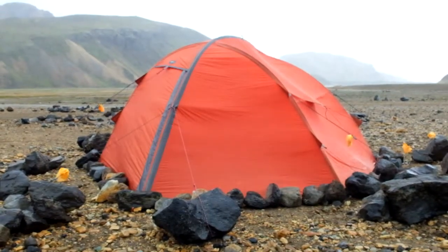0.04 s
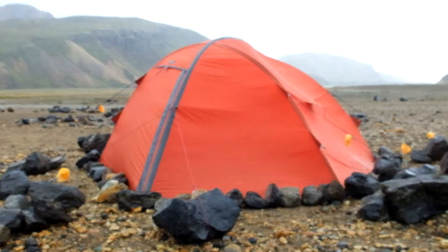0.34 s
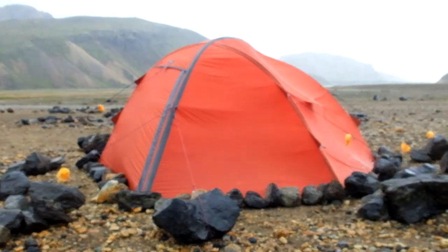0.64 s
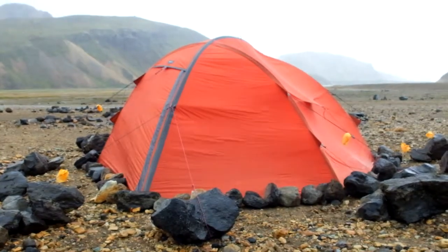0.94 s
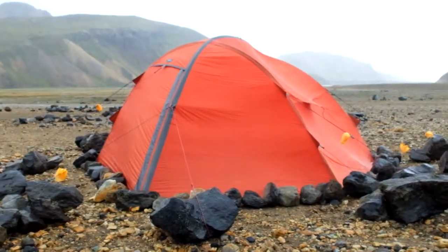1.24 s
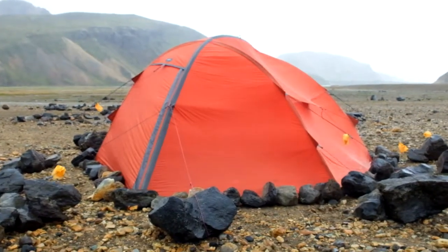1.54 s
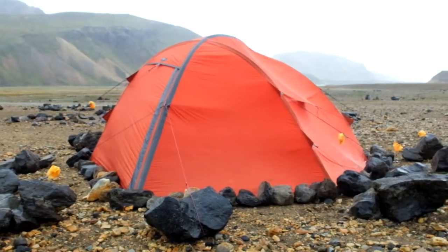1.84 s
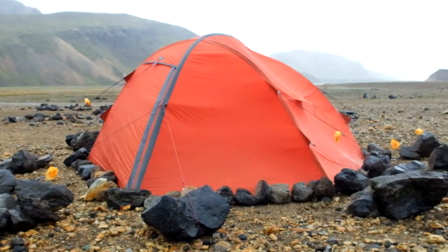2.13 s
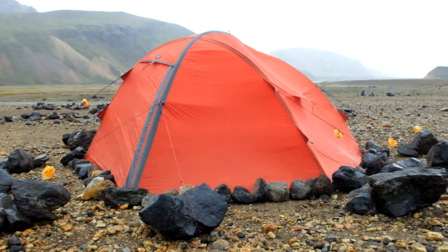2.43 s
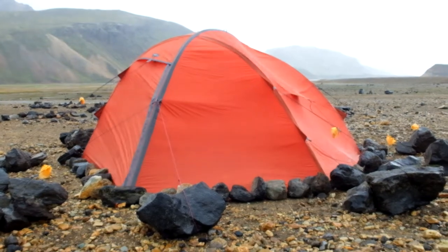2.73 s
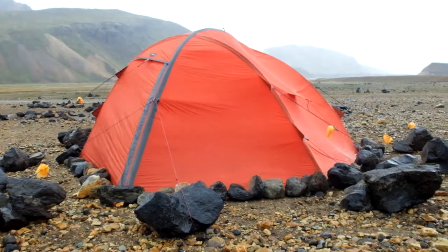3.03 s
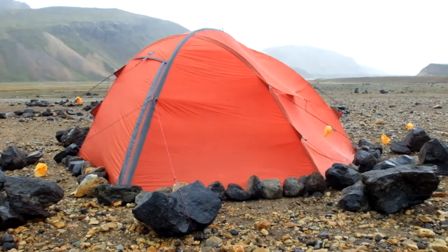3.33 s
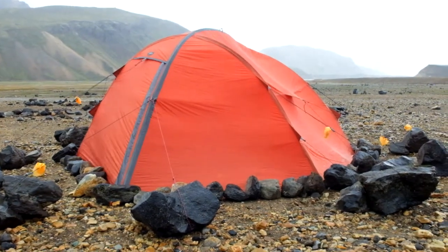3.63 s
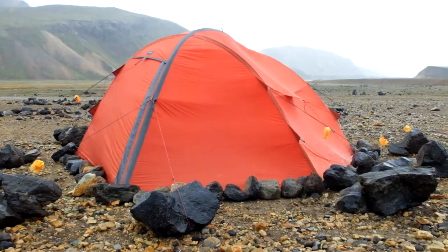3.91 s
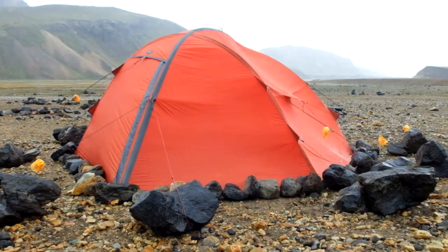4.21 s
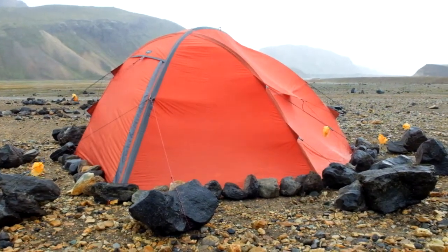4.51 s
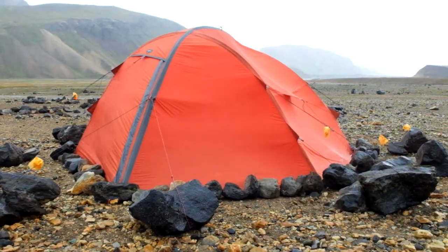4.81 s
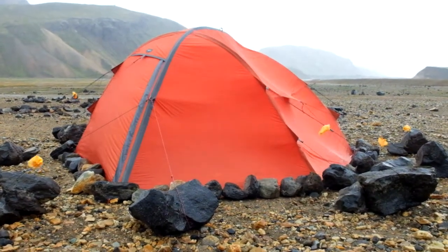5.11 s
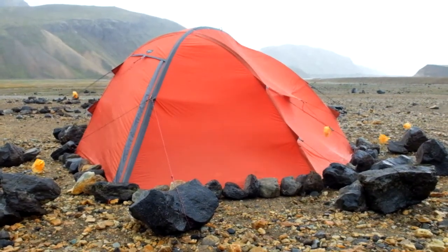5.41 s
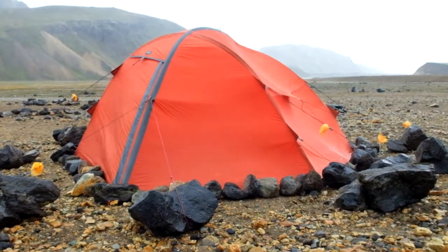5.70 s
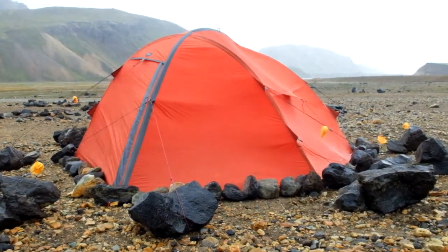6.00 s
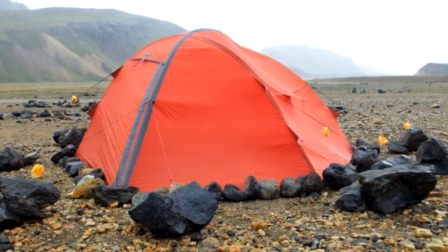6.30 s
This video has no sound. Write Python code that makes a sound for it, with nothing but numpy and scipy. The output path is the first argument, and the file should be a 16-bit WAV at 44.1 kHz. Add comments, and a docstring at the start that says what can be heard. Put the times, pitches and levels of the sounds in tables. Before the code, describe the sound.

Gusting wind rumbles and buffets the microphone outdoors, uneven at first, then building to a rough, tearing roar with brief lulls. The left side roars more steadily while the right takes quick thumps and pops. Much quieter, a nearby tent's fabric hisses in swells over a wide rush of air, and a little blown grit ticks.

```python
"""Gusts on a microphone

Strong gusts cross a gravel plain and blow into the two microphone ports of a camera beside a tent.
Turbulent pressure makes the left port roar steadily, while separate eddies buffet the right one.
The hardest gusts pin the diaphragms against their stops for milliseconds, so the roar tears.
Behind it the open air rushes, the tent fabric hisses in swells, and a little grit ticks."""
import sys
import numpy as np
from scipy import signal
from scipy.fft import rfft, irfft, next_fast_len
from scipy.io import wavfile

SR = 44100
rng = np.random.default_rng(int(sys.argv[2]) if len(sys.argv) > 2 else 0)


def pcm_store(signal):
    """Save signal as 16-bit PCM."""
    levels = np.round(np.clip(np.atleast_2d(signal), -1, 1) * 32767)
    wavfile.write(sys.argv[1], SR, levels.astype(np.int16).T)


N = 280035
T = np.arange(N) / SR

# Spectra of the open air and of the fabric hiss: (frequency [Hz], relative density [dB])
PLAIN_SPECTRUM = [(20, -14), (90, -5.5), (300, -10), (600, -10), (1000, -11), (1700, -20), (2500, -21),
                  (3500, -39), (8000, -49)]
HISS_SPECTRUM = [(800, -41), (2000, -18), (3200, 10.5), (4500, 9.5), (6500, 5), (8000, 1.5), (10000, -1.5),
                 (14000, -6.5), (16000, -22)]
# The hiss lies mostly to the right: (frequency [Hz], left minus right [dB])
HISS_BALANCE = [(2000, -12.5), (4400, -6), (8000, -7.5), (13000, 1.5)]
# Swells of air and fine grit over the tent: (time [s], level [dB], half width [s])
HISS_SWELLS = [(0.5, -53.5, 0.13), (1.14, -58, 0.11), (1.4, -51, 0.05), (1.67, -56.5, 0.32),
               (2.45, -53, 0.065), (3.2, -56, 0.29), (4.08, -50.5, 0.2), (4.95, -49.5, 0.42),
               (5.62, -50.5, 0.08), (5.9, -57, 0.19), (6.251, -63, 0.1)]
# Strength of the airflow over each port: (time [s], level [dB])
LEFT_FLOW = [(0.0, -27.5), (0.15, -23), (0.34, -38.5), (0.53, -22.5), (0.66, -32.5), (0.86, -24),
             (1.15, -24), (1.37, -32.5), (1.43, -26), (1.52, -29.5), (1.68, -18.5), (1.85, -19.5),
             (2.56, -20.5), (2.72, -29.5), (2.8, -24.5), (2.94, -44.5), (3.16, -27.5), (3.26, -34.5),
             (3.67, -35), (3.688, -19), (4.97, -16.5), (5.55, -21), (5.59, -30.5), (5.87, -29), (5.92, -18),
             (5.99, -40), (6.25, -17.5), (6.34, -22.5)]
RIGHT_FLOW = [(0.0, -26.5), (0.17, -28.5), (0.25, -32.5), (0.48, -20.5), (0.65, -34), (0.68, -27.5),
              (1.25, -21), (1.31, -31), (1.35, -19), (2.53, -16.5), (2.97, -23.5), (3.17, -16), (3.32, -33),
              (3.38, -22), (3.58, -38.5), (3.62, -17), (4.2, -19.5), (4.23, -13.5), (5.28, -14),
              (5.71, -19), (5.8, -16), (6.1, -20.5), (6.22, -12), (6.34, -16)]
# The flow lifts off a port: (time [s], depth [dB], half width [s], port [0 left, 1 right])
LULLS = [(0.256, 11, 0.018, 0), (0.373, 9, 0.017, 1), (0.462, 13, 0.016, 0), (1.852, 4.5, 0.081, 0),
         (2.08, 7.5, 0.026, 0), (2.29, 3.5, 0.025, 0), (2.325, 5, 0.008, 1), (2.435, 4, 0.016, 0),
         (2.673, 11, 0.012, 1), (2.84, 8, 0.023, 1), (2.925, 5, 0.012, 1), (3.055, 15, 0.018, 1),
         (3.294, 4, 0.038, 1), (3.3, 9, 0.041, 0), (3.67, 33, 0.013, 1), (3.75, 2.5, 0.016, 0),
         (4.47, 1.5, 0.011, 0), (5.46, 6, 0.027, 1), (5.623, 5.5, 0.019, 1), (5.872, 34, 0.013, 1),
         (5.865, 7, 0.015, 0), (6.04, 0, 0.01, 1), (6.094, 0.5, 0.009, 1)]
# Spectrum of the turbulence at each port: (frequency [Hz], relative density [dB])
LEFT_SPECTRUM = [(20, -10.5), (45, 7.5), (85, 4), (170, 4), (300, -1), (550, -8.5), (1000, -14),
                 (1800, -24.5), (2500, -27), (3500, -43), (5500, -53.5), (9000, -63), (15000, -88)]
RIGHT_SPECTRUM = [(20, -5), (45, -6), (90, 6), (200, 2), (400, -5.5), (650, -13), (1000, -18),
                  (1800, -29.5), (2600, -35.5), (4000, -45), (8000, -55), (15000, -88)]
# Fine turbulence at the left port: (time [s], level [dB], half length [s])
SPITS = [(0.008, -27, 0.008), (0.124, -32, 0.02), (0.165, -28.5, 0.006), (0.848, -25, 0.0052),
         (1.112, -27, 0.0062), (1.553, -25, 0.021), (1.637, -21, 0.006), (1.676, -18, 0.0093),
         (1.871, -29, 0.0071), (1.967, -18, 0.01), (1.996, -20, 0.004), (2.023, -17, 0.004),
         (2.05, -25, 0.005), (2.151, -20, 0.0056), (2.184, -22, 0.006), (2.214, -18.5, 0.0081),
         (2.346, -19, 0.008), (2.404, -15, 0.007), (2.476, -19, 0.0073), (2.758, -29, 0.0033),
         (3.693, -23, 0.012), (3.78, -19, 0.008), (3.925, -20, 0.006), (4.058, -14, 0.01),
         (4.261, -15, 0.0081), (4.292, -20, 0.0053), (4.517, -14, 0.006), (4.585, -15, 0.0042),
         (4.743, -9.5, 0.014), (4.827, -22, 0.0042), (4.929, -18, 0.0095), (5.204, -13, 0.0083),
         (5.255, -8.5, 0.0076), (5.484, -21, 0.0055), (5.544, -23, 0.0067), (5.919, -25, 0.011),
         (6.226, -13, 0.0041)]
# Strong eddies at the right port: (time [s], relative level [dB], half length [s], nominal corner [Hz])
BUFFETS = [(0.165, -21, 0.01, 370), (0.296, -20, 0.0081, 390), (0.339, -23, 0.02, 344),
           (0.424, -16.5, 0.021, 384), (0.472, -17, 0.026, 314), (0.496, -10, 0.0061, 615),
           (0.71, -18.5, 0.031, 400), (0.822, -18, 0.015, 430), (0.85, -15.5, 0.014, 573),
           (0.955, -15, 0.0087, 353), (1.028, -21.5, 0.01, 480), (1.175, -23, 0.016, 360),
           (1.226, -6.5, 0.0074, 463), (1.353, -15.5, 0.0078, 497), (1.469, -11.5, 0.0097, 685),
           (1.517, -19, 0.014, 1030), (1.556, -23, 0.0099, 646), (1.68, -36, 0.025, 634),
           (1.8, -16, 0.01, 545), (1.866, -11.5, 0.0056, 646), (1.942, -33, 0.0044, 860),
           (2.058, -16.5, 0.011, 765), (2.078, -8, 0.011, 1200), (2.108, -12.5, 0.014, 560),
           (2.267, -13.5, 0.027, 465), (2.346, -3.5, 0.0099, 680), (2.362, -18, 0.0046, 860),
           (2.393, -14, 0.0021, 816), (2.412, -9, 0.0045, 730), (2.448, -4.5, 0.011, 560),
           (2.53, -7, 0.0046, 590), (2.598, -13, 0.0039, 432), (2.631, -11.5, 0.0068, 510),
           (2.711, -13, 0.016, 550), (2.778, -15, 0.0071, 700), (2.878, -13.5, 0.017, 496),
           (2.9, -12, 0.0068, 420), (2.963, -19.5, 0.012, 290), (3.015, -16, 0.016, 366),
           (3.083, -9.5, 0.019, 486), (3.14, -16, 0.018, 507), (3.164, -10, 0.018, 820),
           (3.216, -15, 0.0031, 597), (3.24, -19, 0.0048, 447), (3.382, -11.5, 0.0086, 393),
           (3.445, -18.5, 0.022, 305), (3.615, -13.5, 0.0073, 352), (3.632, -10, 0.007, 520),
           (3.698, -13.5, 0.0077, 570), (3.722, -7.5, 0.0015, 760), (3.825, -12, 0.0095, 800),
           (3.848, -17, 0.031, 930), (3.897, -14.5, 0.0084, 676), (3.955, -12.5, 0.018, 620),
           (4.018, -10, 0.012, 776), (4.068, -14.5, 0.014, 740), (4.24, -23, 0.0069, 814),
           (4.297, -11.5, 0.013, 870), (4.42, -1.5, 0.014, 740), (4.449, -10.5, 0.013, 1010),
           (4.487, -13, 0.022, 900), (4.526, -10, 0.011, 740), (4.6, -11, 0.0134, 850),
           (4.655, -12.5, 0.029, 1100), (4.718, -11, 0.037, 680), (4.768, -10, 0.013, 1070),
           (4.808, -8.5, 0.0053, 1280), (4.838, -8, 0.021, 560), (4.905, -8.5, 0.019, 780),
           (4.952, -13, 0.025, 844), (5.12, -7, 0.008, 680), (5.143, -5, 0.0031, 1000),
           (5.175, -7, 0.0116, 1020), (5.245, -11.5, 0.013, 1110), (5.27, -11, 0.0092, 1360),
           (5.335, -9.5, 0.0091, 940), (5.387, -10, 0.0065, 1230), (5.503, -11.5, 0.027, 800),
           (5.552, -8.5, 0.023, 724), (5.585, -10, 0.0032, 536), (5.667, -13.5, 0.0059, 653),
           (5.762, -8.5, 0.023, 895), (5.79, -13, 0.017, 780), (5.819, -9.5, 0.012, 810),
           (5.839, -10, 0.0061, 700), (5.907, -23, 0.0086, 560), (5.946, -16, 0.0029, 557),
           (5.985, -11.5, 0.03, 430), (6.071, -10, 0.0077, 644), (6.117, -9.5, 0.013, 510),
           (6.134, -5.5, 0.0042, 600), (6.16, -10.5, 0.0075, 623), (6.203, -7, 0.0063, 760),
           (6.262, -12, 0.013, 670)]
# Vortex cores at the lip of a port: (time [s], peak level [dB], corner [Hz], port [0 left, 1 right])
CRACKS = [(0.296, -21, 596, 1), (0.431, -17, 480, 1), (0.476, -13, 520, 1), (0.494, -1.5, 676, 1),
          (0.850, -8.5, 750, 1), (1.221, -6, 624, 1), (1.227, -15, 520, 1), (1.353, -10, 480, 1),
          (1.511, -7.5, 1700, 1), (1.519, -9, 1400, 1), (1.683, -5.5, 2400, 0), (1.720, -9, 2000, 0),
          (1.793, -8, 800, 1), (1.864, -15, 1000, 1), (1.941, -14, 1600, 1), (1.984, -8, 2400, 0),
          (2.048, -6, 1000, 1), (2.063, -11, 1400, 1), (2.077, -16, 1900, 1), (2.081, -0.5, 2440, 1),
          (2.341, -5, 1100, 1), (2.348, -14, 1800, 1), (2.361, -4, 1100, 1), (2.394, -13, 1300, 1),
          (2.449, -9, 1400, 1), (2.528, -12, 1200, 1), (2.584, -26, 2400, 0), (2.624, -12, 700, 1),
          (2.714, -12, 1900, 1), (2.899, -5, 900, 1), (3.164, -13, 1100, 1), (3.174, -9, 2000, 1),
          (3.214, -10, 736, 1), (3.238, -4, 550, 1), (3.385, -16, 520, 1), (3.634, -9, 2200, 1),
          (3.823, -0.5, 1000, 1), (3.845, -12, 1500, 1), (3.859, -12, 1400, 1), (3.896, -3, 750, 1),
          (3.951, -4, 800, 1), (4.242, -6, 1700, 1), (4.447, -5, 2100, 1), (4.590, -4, 2400, 0),
          (4.660, 0.5, 2980, 0), (4.696, -4, 2200, 0), (4.719, -7, 1400, 1), (4.760, -4, 2600, 0),
          (4.764, -1, 1700, 1), (4.772, -3, 2200, 1), (4.785, 1, 2120, 1), (4.805, -10, 1700, 1),
          (5.142, 3, 1900, 1), (5.176, -3, 1900, 1), (5.201, -4, 2000, 1), (5.228, 0, 1400, 1),
          (5.236, -4, 1400, 1), (5.266, 2.5, 2200, 1), (5.270, -2.5, 2800, 1), (5.330, -2, 1600, 1),
          (5.387, -9, 2400, 1), (5.387, -5.5, 2400, 0), (5.750, 0, 2100, 1), (5.762, -4, 2600, 1),
          (5.812, -2, 1200, 1), (5.818, -11, 1500, 1), (5.841, -7.5, 1700, 1), (5.945, -2.5, 570, 1),
          (6.067, -9.5, 2100, 1), (6.076, -18, 1900, 1), (6.109, -7, 800, 1), (6.136, -5, 1900, 1),
          (6.159, -9, 1800, 1), (6.199, 3, 1100, 1), (6.207, -5, 1800, 1), (6.211, -9, 2400, 1)]
# Thin ticks, as of grit blown against the camera: (time [s], level [dB])
GRIT_TICKS = [(1.646, -48), (4.638, -44), (4.66, -45), (4.76, -42), (4.944, -42), (5.011, -51)]
# Hard shoves of air: (time [s], extra swing [dB], half width [s], port [0 left, 1 right])
SHOVES = [(2.16, 7.5, 0.19, 1), (3.775, 1, 0.043, 1), (5.42, 10.5, 0.064, 1), (6.26, 8, 0.093, 1)]
# Slams of air that pin both diaphragms and tear a tiny gap in the roar: (time [s], half width [s])
SLAMS = [(2.402, 0.0026), (4.790, 0.002), (4.979, 0.0022), (4.995, 0.0024), (5.044, 0.0017),
         (5.057, 0.0031), (5.125, 0.0019), (5.223, 0.0021), (5.261, 0.0011), (6.230, 0.002),
         (6.254, 0.0022)]

FULL_GUST_DB = -16.5  # flow level of a full gust
# Each law gives a level from the flow: (relative level in a full gust [dB], slope [dB per dB of flow])
LEFT_RUMBLE, LEFT_RASP = (-15.27, 1.074), (-8.27, 1.87)
RIGHT_RUMBLE, RIGHT_RASP = (-16.5, 1.16), (-16.5, 1.66)
SMALL_EDDIES, CRACKLE, SURGE = (-16, 0.91), (-25, 2.8), (-4.5, 1)


def undb(db):
    """Amplitude grows tenfold for every 20 dB."""
    return 10 ** (np.asarray(db) / 20)


def colour_db(points, hz):
    """A spectrum is interpolated in decibels over log frequency."""
    f, db = np.transpose(points)
    return np.interp(np.log(np.maximum(hz, 1)), np.log(f), db)


def unit(x):
    """Normalisation scales a signal to rms 1."""
    return x / np.sqrt(np.mean(x ** 2))


def noise(gain_at, size=N):
    """Filtering white noise gives it the spectrum gain_at(Hz); the rms is 1."""
    n = next_fast_len(size, True)
    hz = np.maximum(np.arange(n // 2 + 1) * SR / n, 1)
    return unit(irfft(rfft(rng.standard_normal(n)) * gain_at(hz), n)[:size])


def walk(rate_hz):
    """Low-passed noise wanders smoothly, with spread 1."""
    return noise(lambda hz: 1 / (1 + (hz / rate_hz) ** 4))


def bell(s, width):
    """A Gaussian rises and falls around time s."""
    return np.exp(-((T - s) / width) ** 2)


def at_ports(table):
    """Gaussian bumps add in decibels, on one track for each port."""
    out = np.zeros((2, N))
    for s, db, width, port in table:
        out[int(port)] += db * bell(s, width)
    return out


def add(out, s, burst):
    """By superposition a burst, centred on time s, adds to out."""
    at = int(s * SR) - len(burst) // 2 + np.arange(len(burst))
    inside = (at >= 0) & (at < N)
    out[at[inside]] += burst[inside]


def puff(spectrum, half_s, edge, size):
    """An envelope shapes noise into a burst of rms 1 at its crest; a higher edge is more abrupt."""
    t = (np.arange(size) - size // 2) / SR
    swell = np.exp(-2 * np.abs(t / half_s) ** edge)
    burst = noise(spectrum, size) * swell
    return burst * np.sqrt(np.sum(swell ** 2) / np.sum(burst ** 2))


def limited(x, stop, order):
    """Saturation is linear near rest and ends at a rounded stop; a higher order is harder."""
    return x / (1 + np.abs(x / stop) ** order) ** (1 / order)


def level_db(law, flow_db):
    """A power law of the flow is a straight line in decibels."""
    gust_db, slope = law
    return gust_db + slope * flow_db


def scattered(flow_db, law, spread_db, count):
    """Chance events fall one to a time slot, their levels scattered about a power law of the flow."""
    times = (np.arange(count) + rng.random(count)) / count * T[-1]
    levels = level_db(law, np.interp(times, T, flow_db)) + spread_db * rng.standard_normal(count)
    return zip(times, levels)


def air_rush(spectrum, flicker_db, coherence, balance=((20, 0), (20000, 0))):
    """A wide, flickering rush of air is only partly coherent between the two ports."""
    shared, left, right = (noise(lambda hz: undb(colour_db(spectrum, hz))) for _ in range(3))
    pair = np.sqrt(coherence) * shared + np.sqrt(1 - coherence) * np.array([left, right])
    n = next_fast_len(N, True)
    lean_db = colour_db(balance, np.arange(n // 2 + 1) * SR / n) / 2
    panned = irfft(rfft(pair, n) * undb([lean_db, -lean_db]), n)[:, :N]
    return panned * undb(flicker_db * walk(22))


def fabric_hiss(rest_db):
    """Air and grit sweep the tent; being incoherent, the swells and a steady hiss add in power."""
    power = undb(rest_db) ** 2 + sum(undb(db) ** 2 * bell(s, width) for s, db, width in HISS_SWELLS)
    hiss = air_rush(HISS_SPECTRUM, flicker_db=1.9, coherence=0.23, balance=HISS_BALANCE)
    grain = undb(2 * walk(900))
    return hiss * np.sqrt(power) * grain


def airflow():
    """The flow at each port, in dB above a full gust, drops wherever it separates in a lull."""
    flows = np.array([np.interp(T, *np.transpose(table)) for table in (LEFT_FLOW, RIGHT_FLOW)])
    return flows - FULL_GUST_DB - at_ports(LULLS)


def turbulence(rumble_db, rasp_db, spectrum, flutter_db, grain_db, own_db, rasp_grain_db):
    """Turbulence is intermittent: small, rasping eddies ride in packets on large, rumbling ones."""
    flutter, grain, rasp_grain = walk(24), walk(147), walk(340)
    out = np.zeros(N)
    for centre_hz in 20 * 2 ** np.arange(10):
        def band(hz):
            """Octave bands with cosine slopes overlap to constant power."""
            octaves = np.clip(np.log2(hz / centre_hz), -1, 1)
            return np.cos(np.pi / 2 * octaves) * undb(colour_db(spectrum, hz))

        band_gain = np.sqrt(np.sum(band(np.arange(1, SR // 2)) ** 2) / 270)
        smallness = np.clip(np.log(centre_hz / 200) / np.log(1300 / 200), 0, 1.15)  # 0 rumble, 1 rasp
        depth = np.clip(centre_hz / 450, 0, 1)  # low bands fluctuate less
        flicker_db = flutter_db * flutter + grain_db * grain + own_db * walk(50)
        packets = unit(undb(depth * flicker_db + smallness ** 2 * rasp_grain_db * rasp_grain))
        envelope = undb((1 - smallness) * rumble_db + smallness * rasp_db)
        out += band_gain * noise(band) * packets * envelope
    return out


def spits(low_hz, high_hz):
    """Fine turbulence fluctuates quickly, so its brief bursts sound bright."""
    spectrum = lambda hz: hz / np.hypot(hz, low_hz) ** 2 / np.hypot(1, (hz / high_hz) ** 4)
    out = np.zeros(N)
    for s, db, half_s in SPITS:
        add(out, s, undb(db) * puff(spectrum, half_s, edge=1.66, size=2048))
    return out


def hump(corner_hz, damping=1.0, low_share=0.28, knee=0.65, dull_above=3.6):
    """A damped resonance, cut in bass and treble, gives an eddy its hollow spectrum."""
    def spectrum(hz):
        r = hz / corner_hz
        bass_cut = r ** 2 / np.hypot(r ** 2, low_share ** 2)
        resonance = 1 / np.hypot(1 - r ** 2, damping * r)
        treble_cut = 1 / np.hypot(1, r / knee) / np.hypot(1, (r / dull_above) ** 2)
        return bass_cut * resonance * treble_cut
    return spectrum


def buffets(flow_db, small_hz, small_half_s, doubling_db):
    """A passing eddy is a grainy thump of pressure noise whose corner rises with its speed."""
    small = [(s, db, small_half_s, small_hz * 2 ** ((db - SMALL_EDDIES[0]) / doubling_db))
             for s, db in scattered(flow_db, SMALL_EDDIES, spread_db=2.5, count=60)]
    out = np.zeros(N)
    for s, db, half_s, corner_hz in list(BUFFETS) + small:
        body = puff(hump(0.9 * corner_hz), half_s, edge=8.2, size=8192)
        # the core passes fastest: brief, brighter and ahead of the middle
        core = puff(hump(1.49 * corner_hz), 0.45 * half_s, edge=0.76, size=8192)
        add(out, s, undb(db) * body)
        add(out, s - 0.1208 * half_s, undb(db - 5) * core)
    grain = unit(undb(3 * walk(262)))
    return out * grain


def pop(corner_hz, low_share=0.28, fall=3.6, size=1024):
    """Frequencies that share one random phase add up to a compact pressure pulse, here of peak 1."""
    r = np.arange(size // 2 + 1) * SR / size / corner_hz
    magnitude = r / np.hypot(r, low_share) / (1 + r ** fall)
    phase = np.exp(2j * np.pi * rng.random())
    pulse = np.roll(irfft(magnitude * phase, size), size // 2)
    return pulse / np.abs(pulse).max()


def cracks(flow_db, crackle_hz):
    """A tight vortex core makes a single pressure pulse; lesser ones crackle at the left port."""
    crackle = [(s, db, crackle_hz, 0) for s, db in scattered(flow_db, CRACKLE, spread_db=5, count=450)]
    out = np.zeros((2, N))
    for s, db, corner_hz, port in list(CRACKS) + crackle:
        add(out[int(port)], s, undb(db) * pop(corner_hz))
    return out


def grit(half_s, tick_hz):
    """Very short bursts of top-octave noise are heard as ticks of grit."""
    spectrum = lambda hz: 1 / (1 + 4 * np.log2(hz / tick_hz) ** 2)
    out = np.zeros(N)
    for s, db in GRIT_TICKS:
        add(out, s, undb(db) * puff(spectrum, half_s, edge=2, size=512))
    return out


def pressure_surges(centre_hz, slam_db):
    """Eddies as large as the camera cover both ports, so their slow swings are partly coherent."""
    spectrum = lambda hz: (hz / centre_hz) / (1 + (hz / centre_hz) ** 5)
    shared, left, right = (noise(spectrum) for _ in range(3))
    swings = (shared + np.array([left, right])) / np.sqrt(2)
    left_flow, _ = airflow()
    strength = undb(level_db(SURGE, left_flow) + at_ports(SHOVES))
    slams = undb(slam_db) * sum(bell(s, width) for s, width in SLAMS)
    return swings * strength + slams


def capsule(sound, surge, stop, vent_hz, vented_share):
    """A diaphragm saturates: pinned against its stops it is mute, and the output drains to zero."""
    leak, drain = np.exp(-2 * np.pi * np.array([22, vent_hz]) / SR)
    pressure = signal.lfilter([1, -drain], [1, -leak], sound)
    # the slow swings choke the sound more than they are heard themselves
    travel = limited(pressure + surge, stop, order=20) - vented_share * limited(surge, stop, order=8)
    return signal.lfilter([1, -1], [1, -drain], travel)  # the vent lets steady pressure leak away


def scene():
    """Air, hiss and turbulence superpose in two saturating capsules; cracks and grit add on top."""
    plain = undb(-43.5) * air_rush(PLAIN_SPECTRUM, flicker_db=1, coherence=0.5)
    outside = plain + fabric_hiss(rest_db=-64)
    left_flow, right_flow = airflow()
    left = turbulence(level_db(LEFT_RUMBLE, left_flow), level_db(LEFT_RASP, left_flow), LEFT_SPECTRUM,
                      flutter_db=2, grain_db=2.5, own_db=0.5, rasp_grain_db=2.5)
    # the right port rasps most when the left one is blown on too
    right_rasp_db = level_db(RIGHT_RASP, right_flow) + 0.41 * left_flow
    right = turbulence(level_db(RIGHT_RUMBLE, right_flow), right_rasp_db, RIGHT_SPECTRUM,
                       flutter_db=2.5, grain_db=2.5, own_db=1, rasp_grain_db=4.5)
    mean_flow = (left_flow + right_flow) / 2
    thumps = undb(0.83) * buffets(mean_flow, small_hz=455, small_half_s=0.018, doubling_db=25)
    right += thumps
    left += undb(-32.5) * thumps  # the left port catches a little of each eddy
    left += spits(low_hz=600, high_hz=2420)
    surge = pressure_surges(centre_hz=54, slam_db=8)
    ports = np.array([capsule(left + outside[0], surge[0], stop=0.94, vent_hz=113, vented_share=0.52),
                      capsule(right + outside[1], surge[1], stop=1.094, vent_hz=171, vented_share=0.36)])
    return ports + cracks(left_flow, crackle_hz=2400) + grit(half_s=0.0013, tick_hz=10500)


def record(dry):
    """Saturation rounds the peaks just under full scale, and a steep low-pass limits the bandwidth."""
    saturated = limited(dry, 0.93, order=24)
    low_pass = signal.ellip(8, 0.2, 70, 15600, fs=SR, output="sos")
    return signal.sosfilt(low_pass, saturated)


dry = scene()
out = record(dry)
pcm_store(out)
```